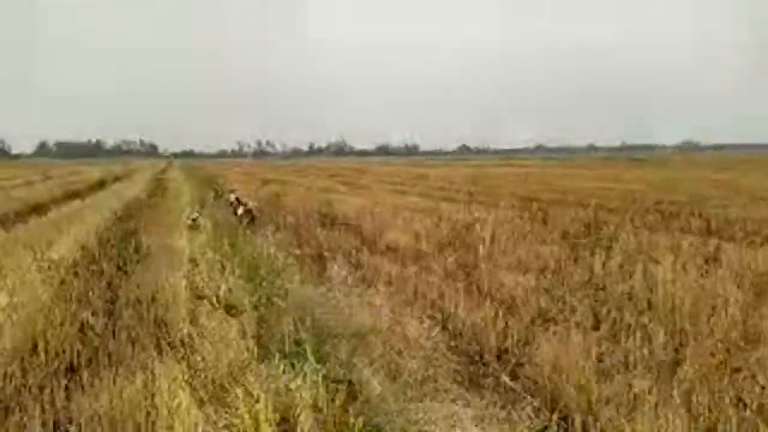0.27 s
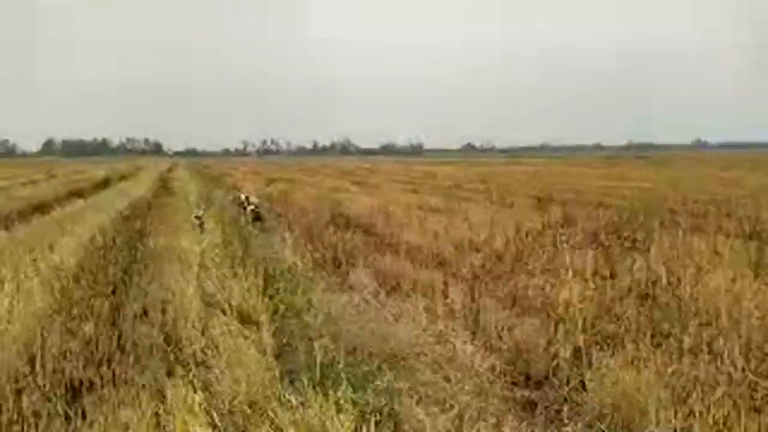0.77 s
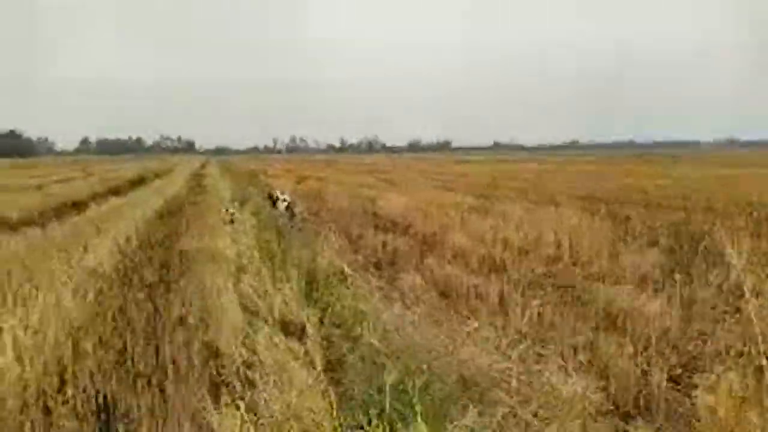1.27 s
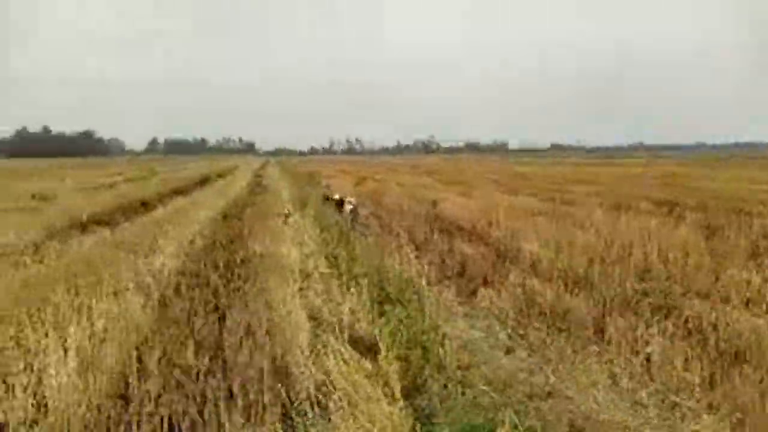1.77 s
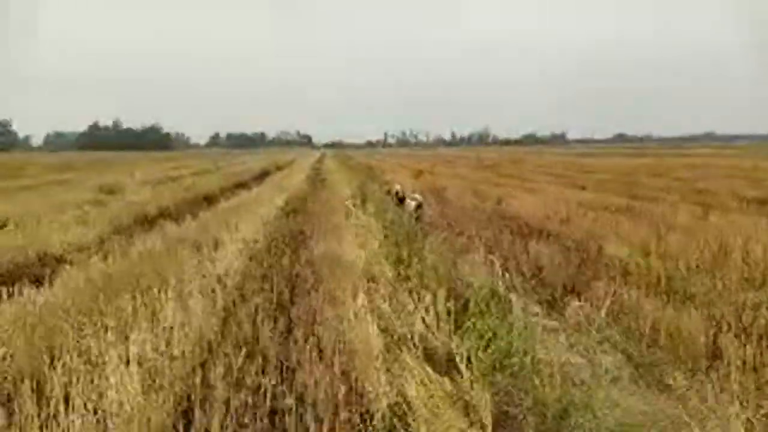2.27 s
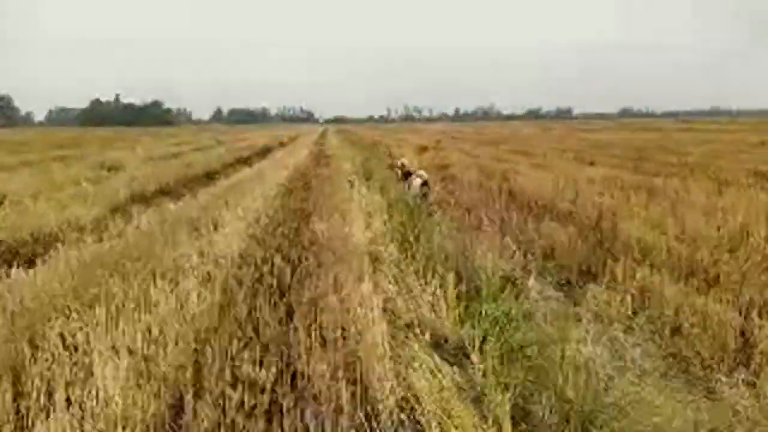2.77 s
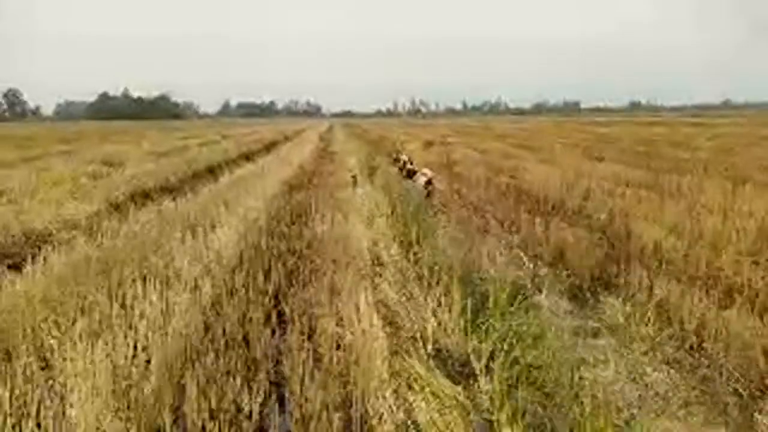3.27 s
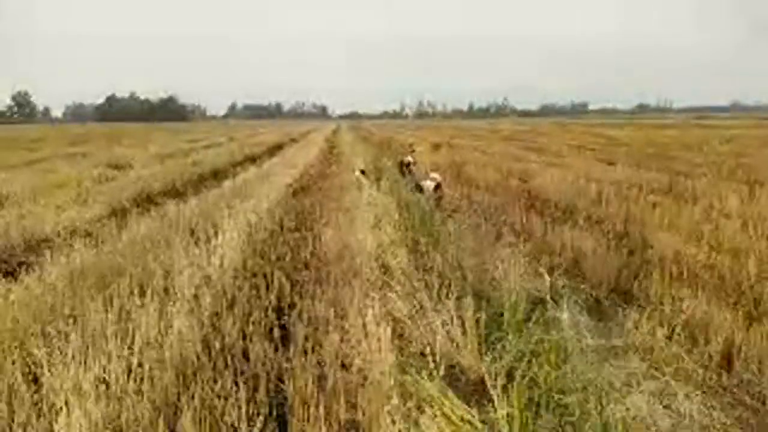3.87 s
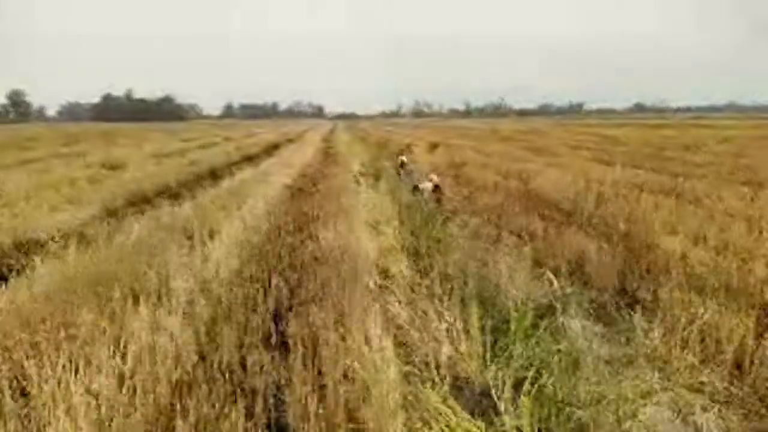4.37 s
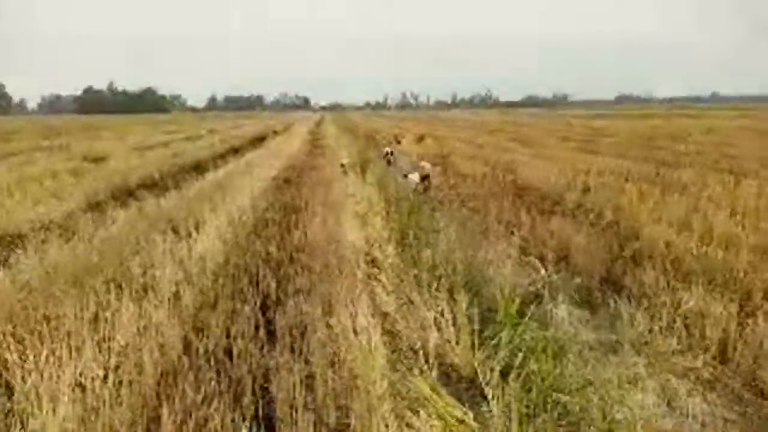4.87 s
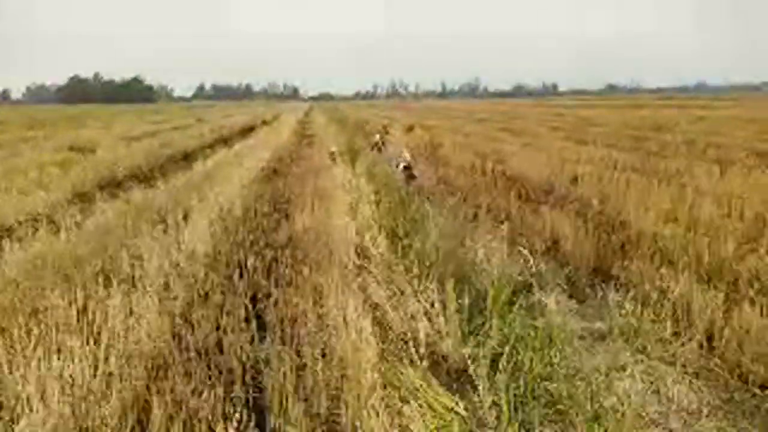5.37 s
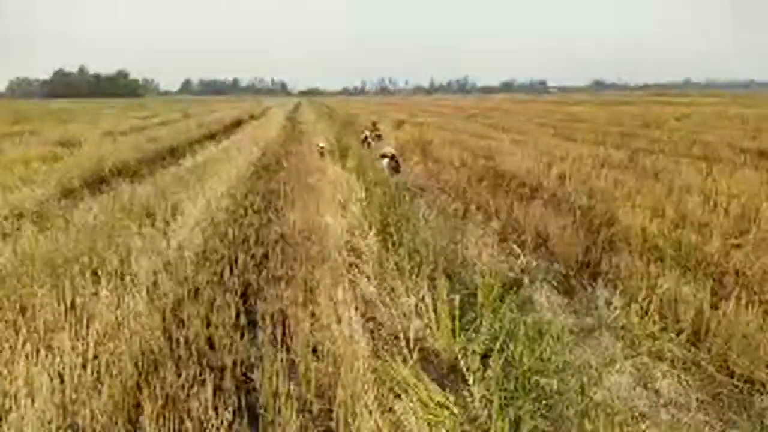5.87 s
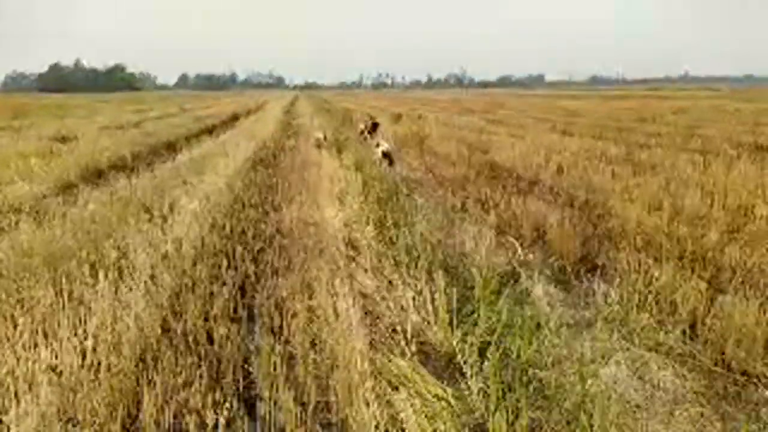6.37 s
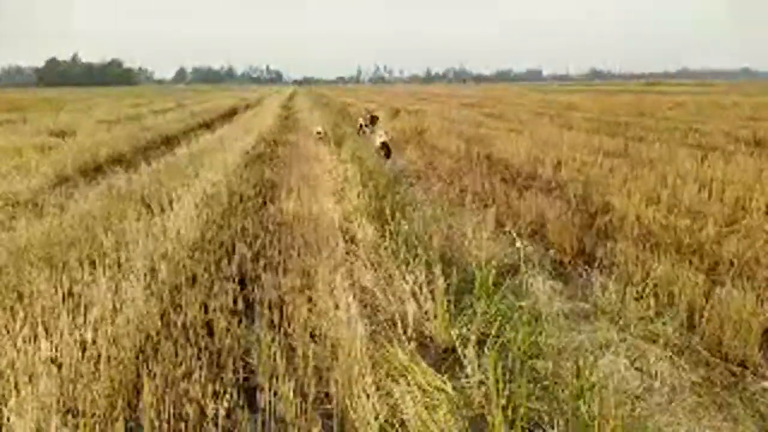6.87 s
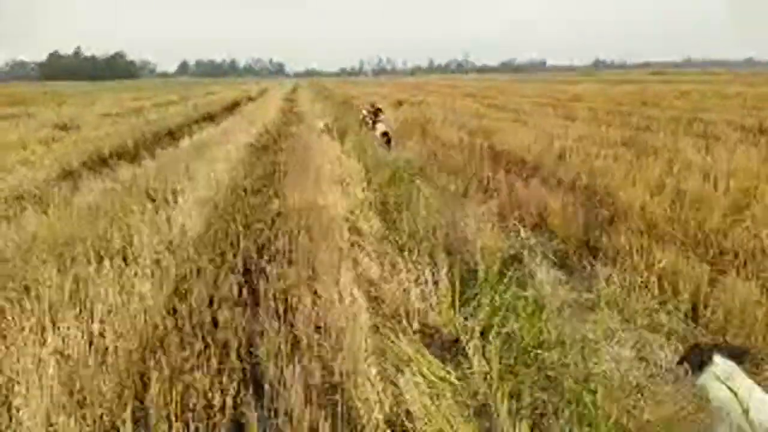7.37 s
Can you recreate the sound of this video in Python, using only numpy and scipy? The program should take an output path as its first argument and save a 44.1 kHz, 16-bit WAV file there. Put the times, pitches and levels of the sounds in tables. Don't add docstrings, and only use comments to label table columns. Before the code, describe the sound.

Close, crisp footsteps crush brittle stalks while legs swish through dry straw outdoors, with a near-quiet pause midway and a very faint distant engine.

```python
import sys
import numpy as np
from scipy import signal
from scipy.fft import rfft, irfft
from scipy.io import wavfile
from scipy.ndimage import uniform_filter1d

SR = 44100
rng = np.random.default_rng(int(sys.argv[2]) if len(sys.argv) > 2 else 0)


def natural_amplitude(level_db):
    exponent = np.asarray(level_db, float) / 20
    return 10 ** exponent


def dump(signal):
    limited = np.clip(np.atleast_2d(signal).T, -1, 1)
    pcm = np.round(limited * 32767).astype(np.int16)
    wavfile.write(sys.argv[1], SR, pcm)


N = 335590

# freq_hz, density_db (per Hz)
STRAW_LOW = [(290, -45.5), (500, -21.5), (651, -15), (878, -4.5), (1170, -3), (1580, 0), (3220, 0.5),
             (4650, -2.5), (7800, -4.5), (10100, -33), (17200, -120)]
STRAW_HIGH = [(8000, -5), (9200, -3), (10200, 0.5), (11500, 1), (12100, -0.5), (14000, -2), (15700, -2)]

# start_s, level_db, lowest_reach_hz
WADING = [(0.0, -35.5, 5160.0), (0.75, -34.5, 5400), (1.35, -41, 5070.0), (1.75, -30, 5310.0),
          (1.9, -41, 6020.0), (2.53, -28, 5190.0), (3.32, -36.5, 5330.0), (3.33, -32.5, 6800),
          (4.2, -42.5, 4500), (4.36, -42, 5030), (4.52, -48, 5260), (5.35, -43, 5200), (5.54, -37.5, 4400),
          (5.62, -42, 5000), (6.54, -33.5, 4060), (6.55, -31.5, 3800), (7.39, -32.5, 4300),
          (7.61, -31, 4940)]
# peak_s, peak_db, rise_ms (per 10 dB), fall_ms (per 10 dB)
SWISHES = [(0.101, -28.5, 49, 98.0), (0.271, -25.5, 56, 51), (0.359, -25, 74, 139), (0.571, -32, 22.0, 67),
           (0.944, -35, 40, 133), (1.26, -30, 105, 140), (1.433, -36, 51.0, 221), (1.901, -23, 62, 163),
           (2.038, -30, 8, 129), (2.135, -33, 27.0, 26.0), (2.351, -32, 63, 106), (2.813, -27.5, 86, 107),
           (3.063, -31, 60, 45), (3.276, -34, 58.0, 87.0), (3.607, -28, 190, 101), (3.981, -37, 219, 81),
           (4.211, -41.5, 77, 32), (4.407, -35.5, 42.0, 171), (4.866, -40, 21, 247), (5.206, -32.5, 46, 3),
           (5.298, -43, -2, 209), (5.442, -49, 29.0, 111.0), (5.462, -31, 28.0, 4), (5.698, -33.5, 34, 68),
           (5.911, -34, 17, 80), (6.074, -25, 49, 90), (6.158, -25.5, 118, 13), (6.19, -30, 30, 150),
           (6.993, -28, 81, 70), (7.341, -28, 31, 51), (7.507, -27.5, 69, 12)]
# peak_s, peak_db
FLICKS = [(0.1155, -36), (0.2512, -24), (0.6183, -32), (0.658, -36), (0.7505, -34), (0.9301, -33.5),
          (1.4692, -39.5), (1.5814, -33), (1.6889, -29), (2.0558, -26), (2.5293, -28), (2.64, -30),
          (2.8475, -35), (3.0473, -30.7), (3.1192, -32), (3.3437, -31.5), (3.5739, -29), (3.6996, -31.7),
          (3.742, -41), (3.8276, -36.0), (4.179, -40.2), (4.3464, -43), (4.42, -43), (4.5439, -44),
          (4.8956, -40.8), (4.9804, -39), (4.9996, -41.2), (5.042, -44), (5.0987, -39.7), (5.3122, -36),
          (5.3394, -39.5), (5.38, -37), (5.4244, -38), (5.5292, -40), (5.5454, -40), (5.7153, -38),
          (5.8293, -42), (5.9649, -32), (6.0517, -26.0), (6.0909, -21.5), (6.1984, -28), (6.389, -32.5),
          (6.4633, -34.5), (6.5514, -38), (6.5761, -32), (6.7185, -29.5), (6.7866, -31), (6.8023, -28),
          (6.8537, -27), (7.058, -26), (7.0991, -32), (7.1662, -30.1), (7.1814, -30), (7.2632, -33),
          (7.3538, -32)]
FLICK_RISE_MS, FLICK_FALL_MS = 11, 11
BELOW_EDGE_DB, BRUSH_TILT_DB, PAST_REACH_DB = -8, 4.5, 37

# start_s, level_db, dryness_db (tilt per octave above the knee)
TREAD = [(0.0, -40, -0.9), (0.69, -43, -4), (0.85, -45.5, -2), (1.56, -38.5, -5), (1.91, -36.5, 0),
         (2.21, -43, -2), (2.52, -32.5, -2.5), (3.2, -43, -1.5), (3.61, -34.5, -0.5), (4.03, -60.5, -2),
         (4.44, -53.5, -5), (5.0, -62, -6), (5.61, -43, -10), (5.71, -86, -4.5), (6.08, -41, -4.0),
         (6.55, -52, -11), (6.87, -40, -6.5), (7.3, -39, -16.5)]
# peak_s, peak_db, rise_ms (per 10 dB), fall_ms (per 10 dB)
CRUNCHES = [(0.094, -35, 21, 129), (0.296, -31, 50, 283.0), (0.411, -33.6, 147.0, 108.0),
            (0.563, -29, 9, 25), (0.958, -39.5, 40, 92.5), (1.248, -31.5, 15, 167), (1.269, -32, 28, 47),
            (1.885, -30.5, 11, 106.0), (1.988, -34.5, 63, 180.0), (2.072, -38.0, 24, 188.0),
            (2.897, -33, 59.0, 24), (3.376, -42, 17.0, 5), (3.699, -39, 24, 46), (3.951, -44, 281, 179.0),
            (5.044, -48, 201, 81), (5.124, -48, 35, 290.0), (5.196, -40, 22, 14), (5.312, -42, -1, 25),
            (5.333, -40, 14, 330.0), (5.69, -36.5, -11, 146), (5.842, -40, -5, 160), (6.167, -35, 167, 87),
            (6.791, -44, 4.0, 299.0), (6.981, -37, -1, 105.0), (6.999, -30, 6, 15)]
KNEE_HZ, LOW_KNEE_HZ, LOW_TILT_DB = 1850, 1300, -3
STEEP_FROM_DB, STEEP_KNEE_HZ, EXTRA_STEEPNESS = -4, 2930, 3.2
# peak_s, peak_db, centre_hz, fall_ms (per 10 dB)
BUNCHES = [(0.059, -27.5, 740, 140.0), (0.244, -29.5, 2750, 130), (0.641, -27.5, 910, 160),
           (0.895, -36.5, 1130, 184.0), (1.097, -29.5, 840, 57), (1.407, -34, 1060, 144),
           (1.478, -27, 770, 78), (1.806, -29, 1000, 63.0), (3.1, -32.5, 990, 78), (5.063, -36.5, 1770, 54),
           (5.141, -31, 1770, 49), (5.469, -28.5, 810, 135), (5.75, -32.5, 990, 127), (5.902, -22, 890, 83),
           (5.908, -29.5, 1800, 26), (7.473, -32, 890, 82), (7.47, -46.5, 3000, 300),
           (4.976, -46, 6200, 90), (5.31, -48.5, 4600, 150), (6.4, -47, 1800, 400), (2.66, -32, 1050, 60),
           (0.33, -31, 890, 60), (4.43, -54.5, 3700, 60), (2.55, -32, 2700, 72), (5.852, -38.5, 5000, 31)]
BUNCH_RISE_MS, BUNCH_SKIRT_DB = 7.5, 20

# start_s, peak_db, ring_hz, crack_db
SNAPS = [(0.067, -26, 1710, -57), (0.093, -11, 4030, -39), (0.242, -18, 3040, -38),
         (0.415, -20.5, 1735, -39), (0.553, -32, 1254, -42), (0.574, -27, 1750, -38),
         (0.645, -26.5, 1205, -55), (0.693, -25, 1590, -53), (0.978, -17.5, 3480, -46),
         (1.091, -38.5, 1090, -45.5), (1.246, -26, 2080, -37.5), (1.332, -25, 2400, -60),
         (2.071, -28, 1700, -39), (2.095, -21, 3260, -42), (2.134, -28, 2270, -41),
         (2.159, -17.5, 3700, -40), (2.282, -26, 2840, -40), (2.356, -19.5, 2680, -36),
         (3.058, -23, 3140, -39.5), (3.363, -27, 2110, -36.5), (3.507, -18, 2630, -39),
         (5.065, -31, 1960, -62), (5.118, -27, 2260, -60), (5.14, -25, 1680, -62),
         (5.469, -35.5, 1004, -52), (5.697, -32, 1800, -41.5), (5.905, -29.5, 1350, -48),
         (6.72, -24, 3800, -45), (6.991, -26.5, 1450, -30.5), (7.097, -29, 2320, -40)]
# start_s, peak_db, ring_hz
TWIGS = [(0.892, -36, 2180), (1.139, -35, 1630), (1.681, -26, 2100), (1.831, -35, 2740), (1.853, -39, 2490),
         (1.882, -25, 1890), (2.029, -28, 2820), (2.801, -34, 1610), (2.884, -29, 1790), (3.1, -32, 2040),
         (3.423, -33, 2300), (3.634, -26, 2970), (3.689, -28, 2500), (5.042, -38, 2080), (5.317, -35, 1760),
         (5.719, -33, 1400), (5.846, -29, 3780), (5.945, -36.5, 1200), (6.086, -29.5, 1760),
         (6.2, -37, 1660), (6.798, -36, 1870), (6.937, -33, 3500), (7.153, -28, 4300), (7.477, -38, 1710)]
# start_s, peak_db, ring_hz
CRACKLES = [(0.1, -28, 6120), (0.2477, -24, 3140), (0.318, -29, 4010), (0.4365, -28, 2370),
            (0.6266, -30, 6460), (0.7377, -41, 1380), (1.0207, -39, 2940), (1.1998, -39, 2580),
            (1.2704, -28.5, 1560), (1.2907, -29.5, 2200), (1.4615, -36, 1520), (1.5822, -39, 1350),
            (1.6104, -35, 3230), (1.6937, -26.5, 3320), (1.7205, -33.5, 1500), (1.891, -19.5, 6200),
            (1.989, -29, 2260), (2.175, -32, 4180), (2.479, -29.5, 4090), (2.5886, -33, 2150),
            (2.681, -27.5, 5340), (2.7373, -31, 2200), (2.828, -29, 3400), (2.8707, -31, 1980),
            (2.8935, -31, 2150), (2.9625, -36.5, 1590), (3.0254, -38.5, 1670), (3.1202, -42, 2540),
            (3.369, -38, 1890), (3.5759, -31.5, 1490), (3.667, -32, 2580), (3.6988, -34, 6460),
            (3.7034, -34, 3400), (3.8528, -35.5, 2500), (3.9722, -42, 3270), (4.05, -40, 5680),
            (4.2236, -48, 5000), (4.2488, -48, 5470), (4.309, -41, 5430), (4.3302, -50, 5900),
            (4.5452, -52, 5900), (4.8086, -54, 2020), (4.9796, -45, 2150), (5.0987, -42, 1980),
            (5.1338, -35.5, 1590), (5.1443, -44, 1680), (5.1902, -41, 6460), (5.2, -41, 2430),
            (5.3087, -43, 6290), (5.4219, -41, 5990), (5.4595, -34.5, 2400), (5.7834, -40, 2630),
            (5.8534, -36, 5250), (5.9096, -37, 1420), (6.126, -32, 4910), (6.3349, -39, 5990),
            (6.6414, -45, 4350), (7.0158, -36, 1720), (7.1455, -36, 4220), (7.3727, -37, 6460)]
# start_s, peak_db, ring_hz
THIN_SNAPS = [
    (0.5542, -24.5, 3600),
    (0.5755, -27, 3300),
    (5.1185, -39, 4050),
    (6.088, -23, 6030),
    (7.152, -33, 4630),
    (2.804, -26, 5590),
    (3.0595, -32, 5500),
]
TWIG_CRACK_DB, CRACKLE_CRACK_DB = -15.5, -20
CRACKLE_CYCLES, CRACKLE_GAIN_DB = 1.3, -1.5
# start_s, peak_db
TIPS = [(0.1015, -18), (0.569, -17.5), (0.573, -10.5), (0.662, -22), (0.729, -14), (0.735, -27),
        (0.8188, -16), (1.439, -26), (1.584, -27), (1.7546, -14), (1.7585, -17), (2.135, -17), (2.642, -21),
        (4.3834, -29), (4.4465, -30), (4.484, -28), (4.527, -34), (4.875, -28), (4.879, -30), (4.9795, -32),
        (5.0415, -33), (5.099, -29), (5.191, -19), (5.201, -27), (5.309, -24), (5.3805, -26), (5.4225, -25),
        (5.452, -24), (5.698, -25), (5.8295, -28), (6.064, -14), (6.0895, -14), (6.641, -26), (6.7215, -16),
        (6.9905, -16), (6.9935, -14), (7.1, -21), (7.4332, -13), (7.4356, -13), (7.5043, -22)]

# freq_hz, density_db (per Hz)
BACKGROUND = [(500, -99), (900, -83.5), (1500, -99.5), (3000, -100.5), (5000, -111.5), (8000, -108)]
EDGE_HZ = 8000
FRAME = dict(fs=SR, nperseg=512, noverlap=384)

# start_s, peak_db, pitch_hz
KNOCKS = [
    (0.1, -53, 274),
    (2.182, -40.5, 512),
    (6.099, -53.5, 570),
    (7.069, -54, 174),
    (7.38, -59, 167),
]
# start_s, length_s, mouth_start_hz, mouth_end_hz, level_db
PANTS = [(4.22, 0.081, 1116, 1800, -70), (4.27, 0.12, 1556, 1800, -72.5), (4.43, 0.073, 1420, 1450, -69),
         (4.44, 0.097, 1980, 2240, -72), (4.58, 0.046, 1630, 1700, -71.5), (4.61, 0.071, 2050, 2100, -73.5),
         (4.75, 0.037, 1405, 1500, -63.5), (4.75, 0.1, 2120, 1970, -66.5), (4.79, 0.03, 2600, 2750, -73),
         (4.92, 0.12, 1580, 2140, -64), (4.95, 0.065, 2070, 2430, -63)]
# pitch_hz, level_db
FIRING_ORDERS = [(68, -77.5), (102, -83.5), (136, -82.5), (170, -91), (204, -75), (272, -85.5)]
# freq_hz, density_db (per Hz)
RUMBLE = [(30, -44), (48, -36), (62, -1), (150, -3.5), (300, -9), (500, -11.5), (900, -18.5), (1500, -24.5),
          (3000, -34), (8000, -27)]
RUMBLE_DB = -66.5
# peak_s, peak_db, rise_ms (per 10 dB), fall_ms (per 10 dB)
LEAKS = [
    (3.07, -61.5, 15, 29),
    (4.406, -66, 12, 21),
    (4.756, -60.5, 9, 16),
    (6.58, -53, 14, 29),
    (6.71, -49.5, 32, 56),
    (6.82, -55, 20, 22),
    (7.192, -52, 6, 25),
    (7.348, -67, 18, 25),
    (7.405, -55, 13, 30),
    (7.47, -67.5, 17, 22),
]
# pitch_hz, level_db
LEAK_ORDERS = [(535, -1.7), (603, 1)]
# start_s, length_s, start_hz, end_hz, level_db
WHINE = [
    (.88, 0.31, 1485, 1462, -62),
    (2.08, 0.53, 1415, 1370, -63),
]
# peak_s, peak_db, rise_ms (per 10 dB), fall_ms (per 10 dB)
GUSTS = [
    (4.634, -80, 50, 170),
    (4.888, -59.5, 49, 27),
    (5.228, -58, 21, 112),
    (5.78, -56.5, 203, 74),
]


def rustle():
    clumps = giving_way(70)
    hz, times, coarse = signal.stft(grains(1200, 3.0, 1.8 * clumps, hiss=1.0), **FRAME)
    fine = signal.stft(grains(12000, 1.95, 0.5 * clumps, hiss=0.64), **FRAME)[2]
    fine_share = np.clip((hz[:, None] - 3500) / 4500, 0, 1)
    source = np.sqrt(1 - fine_share) * coarse + np.sqrt(fine_share) * fine

    shape_db = np.where(hz < EDGE_HZ, at_hz(STRAW_LOW, hz), at_hz(STRAW_HIGH, hz))
    octave = np.log2(hz[:, None] + 1)
    below = hz[:, None] < EDGE_HZ
    power = brushing(octave, below, times) + crushing(octave, times) * below

    patch_db = 1.18 * mottle(source.shape, bins=9, frames=7)
    speckled = (hz > EDGE_HZ) & (hz < 12000)
    patch_db += 2.8 * mottle(source.shape, bins=1, frames=6) * speckled[:, None]
    gain = np.sqrt(power) * natural_amplitude(shape_db[:, None] + patch_db - 1.0)
    return signal.istft(source * gain, **FRAME)[1][:N]


def brushing(octave, below, times):
    level_db, reach_hz = in_time(WADING, times)
    flicks = [(s, db, FLICK_RISE_MS, FLICK_FALL_MS) for s, db in FLICKS]
    power = natural_amplitude(2 * level_db) + surges(SWISHES + flicks, times).sum(axis=0)
    reach_db = BELOW_EDGE_DB + BRUSH_TILT_DB * (octave - np.log2(EDGE_HZ))
    reach_db = reach_db + PAST_REACH_DB * np.minimum(octave - np.log2(reach_hz), 0)
    return power * natural_amplitude(2 * reach_db * below)


def crushing(octave, times):
    level_db, dryness = in_time(TREAD, times)
    tilt_db = dryness * np.maximum(octave - np.log2(KNEE_HZ), 0)
    tilt_db += LOW_TILT_DB * np.minimum(octave - np.log2(LOW_KNEE_HZ), 0)
    excess_db = np.clip(dryness - STEEP_FROM_DB, -5, 0)
    tilt_db += EXTRA_STEEPNESS * excess_db * np.maximum(octave - np.log2(STEEP_KNEE_HZ), 0)
    power = (natural_amplitude(2 * level_db) + surges(CRUNCHES, times).sum(axis=0)) * natural_amplitude(2 * tilt_db)

    centres = np.log2([row[2] for row in BUNCHES])
    skirts = natural_amplitude(-2 * BUNCH_SKIRT_DB * (octave - centres) ** 2)
    folds = [(s, db, BUNCH_RISE_MS, fall) for s, db, _, fall in BUNCHES]
    return power + skirts @ surges(folds, times)


def grains(per_s, spread_db, swell_db, hiss):
    sizes = natural_amplitude(spread_db * np.minimum(rng.exponential(1, N), 4.5)) * rng.choice([-1, 1], N)
    born = rng.random(N) < per_s / SR
    return rms_one(natural_amplitude(swell_db) * (rms_one(sizes * born) + hiss * rng.standard_normal(N)))


def giving_way(per_s):
    gives = (rng.random(N) < per_s / SR) * rng.exponential(1, N)
    relax_s = 0.0082
    return np.minimum(signal.lfilter([1], [1, -np.exp(-1 / (relax_s * SR))], gives), 2.2)


def surges(rows, times):
    s, peak_db, rise_ms, fall_ms = np.transpose(rows)[:, :, None]
    since_ms = (times - s) * 1000
    rising = -since_ms / np.maximum(rise_ms, 2)
    falling = since_ms / np.maximum(fall_ms, 2)
    return natural_amplitude(2 * (peak_db - 10 * np.where(since_ms < 0, rising, falling)))


def mottle(shape, bins, frames):
    field = uniform_filter1d(rng.standard_normal(shape), size=bins, axis=0)
    for _ in range(2):
        field = uniform_filter1d(field, size=frames, axis=1)
    return rms_one(field)


def snaps():
    rings, cracks = np.zeros(N), np.zeros(N)
    t = np.arange(900) / SR
    stalks = SNAPS + [(s, db, hz, db + TWIG_CRACK_DB) for s, db, hz in TWIGS]
    stalks = stalks + [(s, -120, hz, db + CRACKLE_CRACK_DB) for s, db, hz in CRACKLES]
    for s, peak_db, hz, crack_db in stalks:
        over, phase = rng.random(2)
        overtone_hz = hz * (1.21 + 0.5 * over)
        wave = np.sin(2 * np.pi * hz * t) + 0.16 * np.sin(2 * np.pi * (overtone_hz * t + phase))
        decay_cycles = np.clip(5500 / hz, 1.5, 5)
        swell = (1 - np.exp(-t / 0.00077)) * np.exp(-t * hz / decay_cycles)
        burst = natural_amplitude(peak_db + 1.5) * wave * swell
        crack = natural_amplitude(crack_db + 4.5) * np.exp(-t / 0.0017)
        start = round(s * SR)
        rings[start:start + 900] += burst[:N - start]
        cracks[start:start + 900] += crack[:N - start]
    crack_spectrum = [(600, -28), (1200, 0.5), (3500, 8.5), (8000, 5.0), (12000, -23.5)]
    return rings + cracks * coloured(rng.standard_normal(N), crack_spectrum)


def crackles():
    out, t = np.zeros(N + 900), np.arange(900) / SR
    for s, peak_db, hz in CRACKLES + THIN_SNAPS:
        age = t * hz / CRACKLE_CYCLES
        envelope = age * np.exp(1 - age)
        start = round(s * SR)
        out[start:start + 900] += natural_amplitude(peak_db + CRACKLE_GAIN_DB) * envelope * np.sin(2 * np.pi * hz * t)
    return out[:N]


def straw_tips():
    clicks = np.zeros(N)
    clicks[[round(s * SR) for s, db in TIPS]] = natural_amplitude(np.array(TIPS)[:, 1] - 9.5)
    return ring(clicks, 9400, 0.005) - ring(clicks, 11300, 0.0045) + ring(clicks, 13600, 0.004)


def ring(clicks, hz, t60):
    r, w = natural_amplitude(-60 / (t60 * SR)), 2 * np.pi * hz / SR
    return signal.lfilter([0, np.sin(w)], [1, -2 * r * np.cos(w), r * r], clicks + 1e-18)


def suppressor(x):
    hz, times, spec = signal.stft(x, **FRAME)
    power = uniform_filter1d(uniform_filter1d(abs(spec) ** 2, size=3, axis=0), size=7, axis=1)
    per_hz = power * 2 * FRAME["nperseg"] / (1.5 * SR)
    background = natural_amplitude(2 * at_hz(BACKGROUND, hz))[:, None]
    gain = np.clip(1 - background / (per_hz + 1e-20), natural_amplitude(-8), 1) ** 2
    return signal.istft(spec * np.where(hz[:, None] < EDGE_HZ, gain, 1), **FRAME)[1][:N]


def handling():
    rows = [(s - 0.01, 0.045, hz, hz, db) for s, db, hz in KNOCKS]
    return swept_noise(rows, width_hz=87, fall=2.95)


def panting():
    return swept_noise(PANTS, width_hz=190) * natural_amplitude(2.7 * drift(60)[0] + 1)


def engine():
    turns = np.cumsum(1 + 0.00563 * drift(1.9)[0]) / SR
    low = high = 0
    for (hz, db), waver in zip(FIRING_ORDERS, natural_amplitude(1.05 * drift(2.6, count=9))):
        low = low + natural_amplitude(db + 4.5) * waver * np.sin(2 * np.pi * hz * turns)
    for (hz, db), waver in zip(LEAK_ORDERS, drift(22.5, count=2) + 0.96):
        high = high + natural_amplitude(db) * waver * np.sin(2 * np.pi * hz * turns)
    leak = np.sqrt(surges(LEAKS, np.arange(N) / SR).sum(axis=0))
    rumble = natural_amplitude(RUMBLE_DB - 2) * coloured(rng.standard_normal(N), RUMBLE)
    return low + leak * rms_one(high) + rumble


def whine():
    return swept_noise(WHINE, width_hz=35)


def wind():
    level = np.sqrt(surges(GUSTS, np.arange(N) / SR).sum(axis=0))
    puffs = coloured(rng.standard_normal(N), [(30, -57), (55, -14), (80, -8.5), (130, -18), (300, -44)])
    return level * natural_amplitude(-1.5 + 2.5 * drift(11)[0]) * puffs


def swept_noise(rows, width_hz, fall=0.0):
    out = np.zeros(N)
    lowpass = signal.butter(2, width_hz / 2, fs=SR, output="sos")
    for s, length_s, hz_from, hz_to, level_db in rows:
        n, start = int(length_s * SR), int(s * SR)
        wobble = signal.sosfilt(lowpass, rng.standard_normal((2, 24000)))[:, -n:]
        turn = 2 * np.pi * np.cumsum(np.linspace(hz_from, hz_to, n)) / SR
        puff = rms_one(wobble[0] * np.sin(turn) + wobble[1] * np.cos(turn))
        envelope = np.sqrt(np.hanning(n)) * np.exp(-fall * np.arange(n) / n)
        out[start:start + n] += natural_amplitude(level_db) * puff * envelope
    return out


def drift(rate, count=1):
    r = np.exp(-64 * np.pi * rate / SR)
    noise = rng.standard_normal((count, N // 32 + 2002))
    slow = signal.lfilter([1], [1, -2 * r, r * r], noise)[:, 2000:]
    return np.repeat(rms_one(slow), 32, axis=1)[:, :N]


def coloured(x, spectrum):
    hz = np.arange(N // 2 + 1) * SR / N
    return rms_one(irfft(rfft(x) * natural_amplitude(at_hz(spectrum, hz)), N))


def at_hz(points, hz):
    freq_hz, level_db = np.array(points).T
    return np.interp(np.log(hz + 1), np.log(freq_hz), level_db)


def in_time(rows, times):
    s, *columns = np.transpose(rows)
    return [np.interp(times, s, c) for c in columns]


def rms_one(x):
    return x / np.sqrt(np.mean(x ** 2) + 1e-20)


def scene():
    straw = suppressor(rustle() + snaps() + crackles() + straw_tips())
    mono = straw + handling() + panting() + engine() + whine() + wind()
    return np.array([mono, mono])


def roll_off(x):
    return signal.sosfilt(signal.butter(12, 17040, fs=SR, output="sos"), x)


def record(dry):
    hz = np.arange(N // 2 + 1) * SR / N
    mix = irfft(rfft(dry) * (hz < 15750), N)
    return roll_off(mix)


dry = scene()
out = record(dry)
dump(out)
```